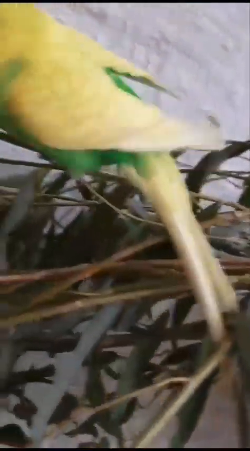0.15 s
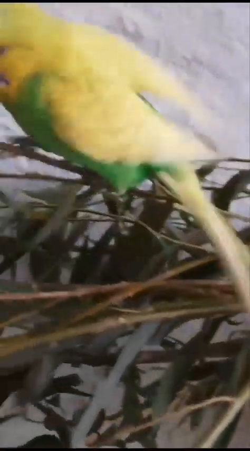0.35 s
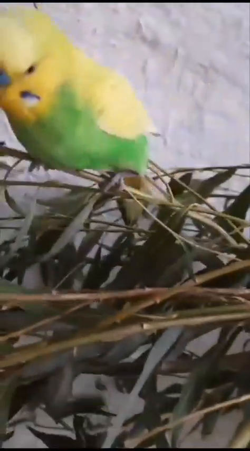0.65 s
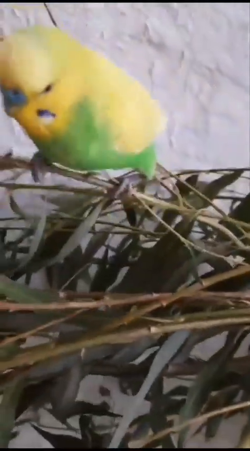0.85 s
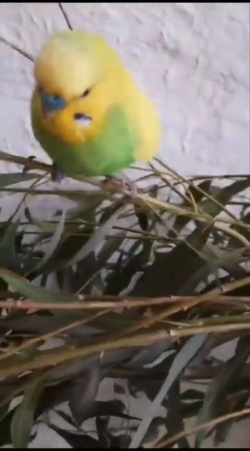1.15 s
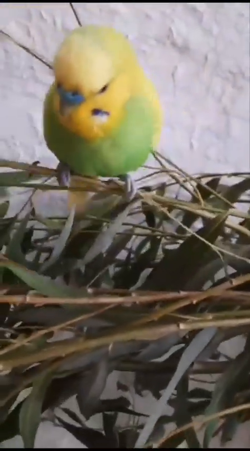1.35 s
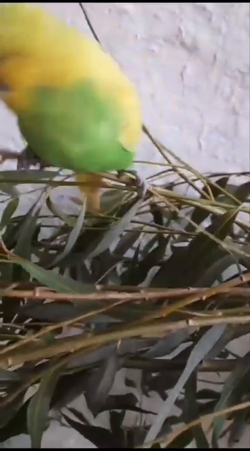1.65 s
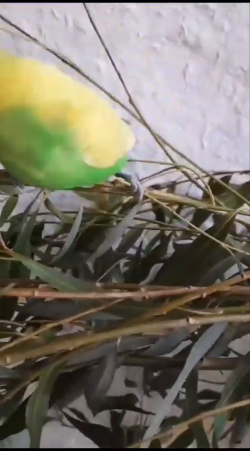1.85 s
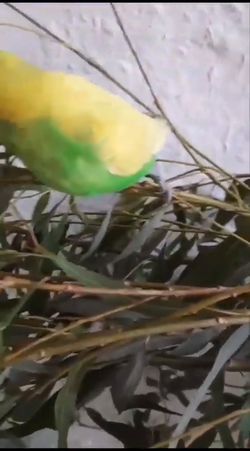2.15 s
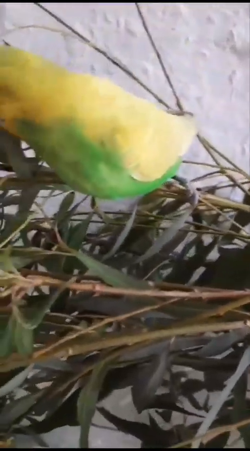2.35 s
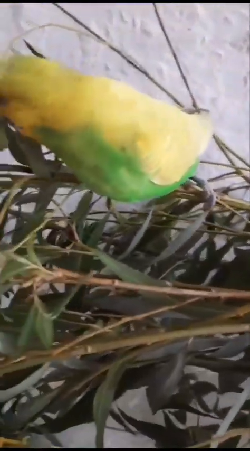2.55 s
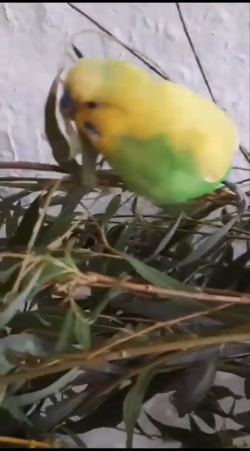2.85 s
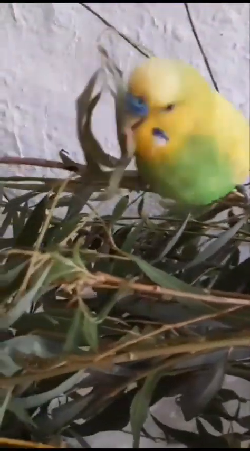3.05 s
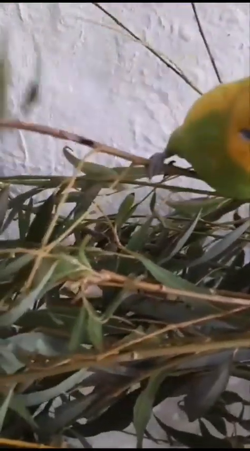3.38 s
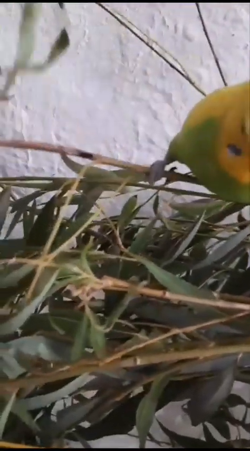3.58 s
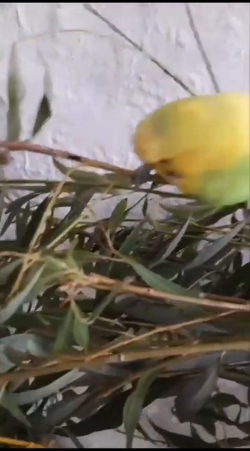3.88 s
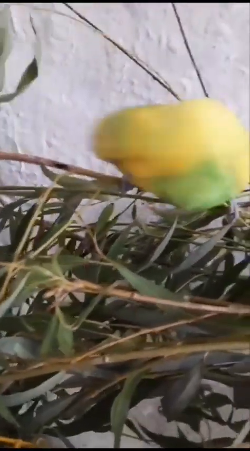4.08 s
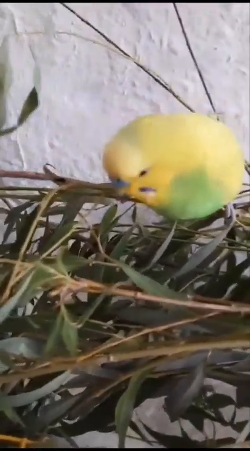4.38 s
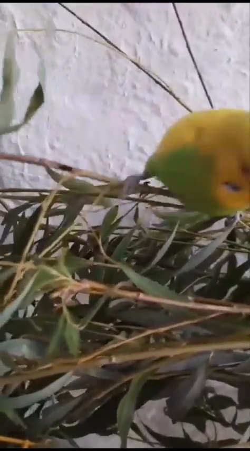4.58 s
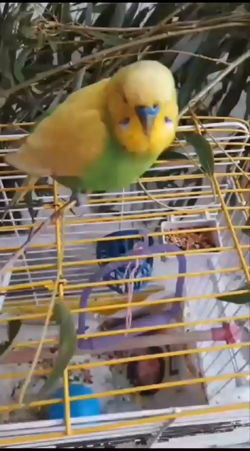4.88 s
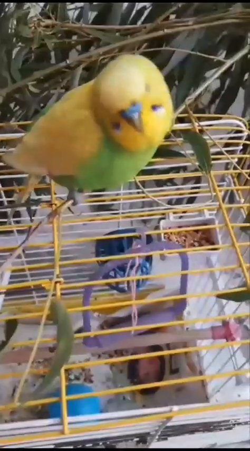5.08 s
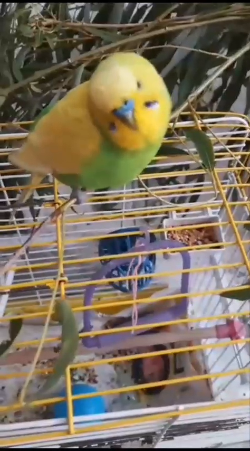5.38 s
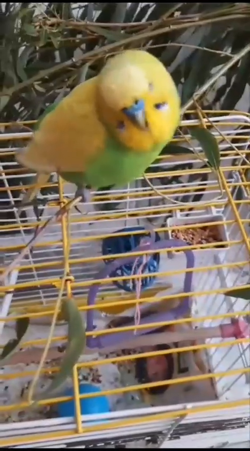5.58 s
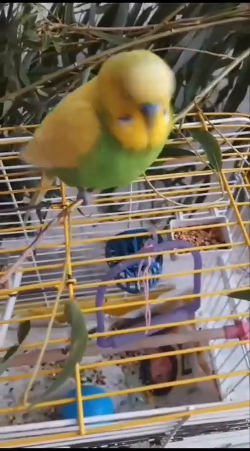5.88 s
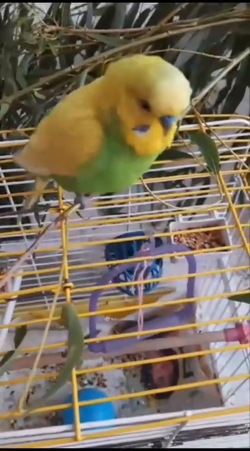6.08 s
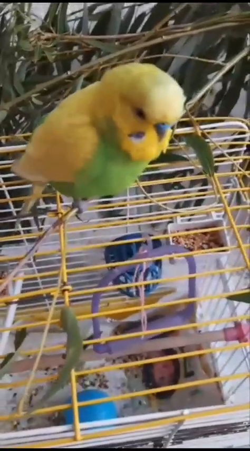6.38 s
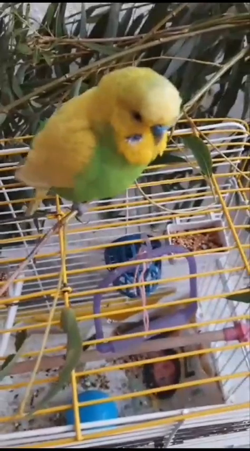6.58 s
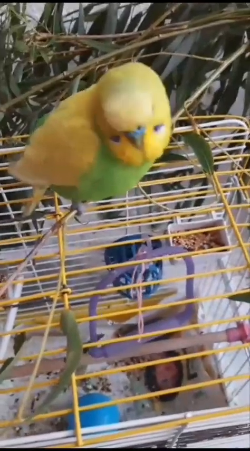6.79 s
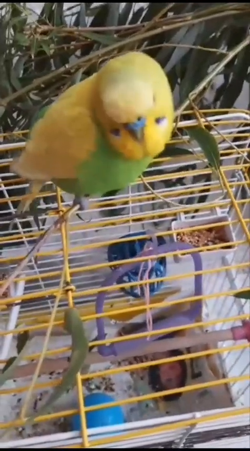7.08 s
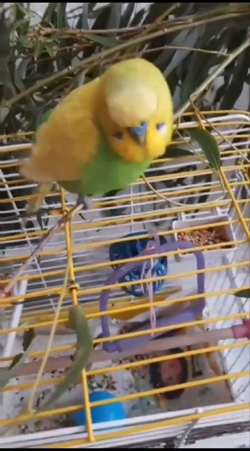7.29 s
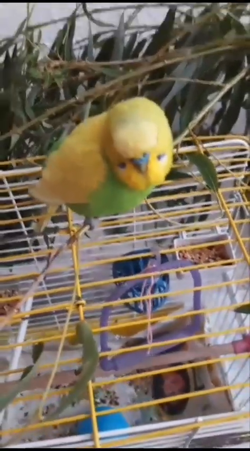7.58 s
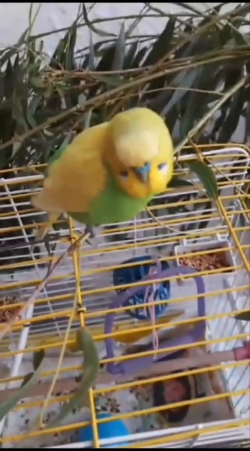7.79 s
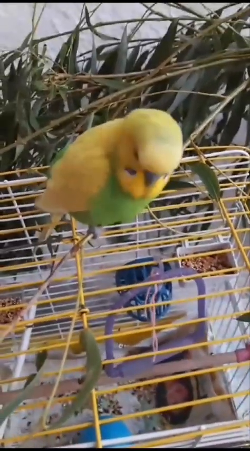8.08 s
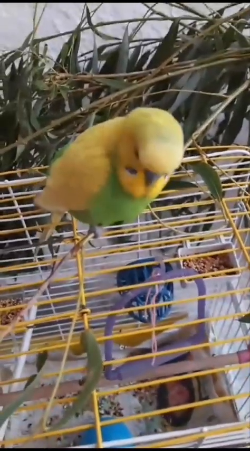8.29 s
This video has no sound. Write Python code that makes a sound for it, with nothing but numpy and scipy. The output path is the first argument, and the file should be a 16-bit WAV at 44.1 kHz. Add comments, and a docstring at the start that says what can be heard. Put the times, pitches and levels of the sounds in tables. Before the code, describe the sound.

A pet budgie chatters indoors: high, raspy squawks, each a fraction of a second, chopped into a fast rattle and spaced evenly. After about two and a half seconds it falls nearly silent except for two brief twittering chirps. Following a tiny dropout, the stereo balance shifts and scolding resumes, with smoother chirps mixed in, over soft hiss and faint room tone.

```python
"""Budgerigar scolding in a small room

Close to a two-port microphone a budgerigar gives two runs of harsh squawks, with chirps among and between them.
Its syrinx sings tones that swing wildly in pitch, chopped some 170 times a second; most chirps are smoother.
The room rings on after each call, a soft hiss comes and goes over faint room tone, and feathers rustle once.
A little past half way all sound drops out briefly; the balance of the two ports differs before and after."""
import sys
import numpy as np
from scipy import signal
from scipy.fft import rfft, irfft, next_fast_len
from scipy.io import wavfile
from scipy.ndimage import uniform_filter1d, map_coordinates

SR = 44100
rng = np.random.default_rng(int(sys.argv[2]) if len(sys.argv) > 2 else 0)


def materialize(psi):
    """Save the field psi as 16-bit PCM at rate SR to the path in sys.argv[1].

    A 1-D psi becomes a single channel; in a 2-D psi each row is a channel.
    """
    bounded = np.clip(np.atleast_2d(psi).T, -1, 1)
    quanta = np.round(bounded * 32767).astype(np.int16)
    wavfile.write(sys.argv[1], SR, quanta)


N = 372644
TIME = np.arange(N) / SR
# the brief silence: start_s, end_s
DROPOUT = (4.992, 5.078)


def undb(db):
    """Decibels to amplitude gain."""
    return 10 ** (np.asarray(db) / 20)


def unit(x):
    """Scale to rms 1."""
    return x / np.sqrt(np.mean(x ** 2))


def along(points, hz):
    """Read (frequency, value) points on a log-frequency axis."""
    point_hz, value = np.transpose(points)
    return np.interp(np.log(hz + 1), np.log(point_hz), value)


def colour(x, points, sign=1):
    """Filter by (Hz, dB) points, or by their inverse when sign is -1."""
    size = next_fast_len(x.shape[-1] + 512)
    gain = undb(sign * along(points, np.fft.rfftfreq(size, 1 / SR)))
    return irfft(rfft(x, size) * gain, size)[..., :x.shape[-1]]


def wander(t, rate):
    """A smooth random course with a new value `rate` times a second, spread near 1."""
    values = rng.standard_normal(1024)
    return map_coordinates(values, [(t - t[0]) * rate], order=3, mode="wrap")


def chop(t, rate, depth, sag_s, jitter=0.11, scatter_db=2.17, sharp=0.89):
    """The airflow is chopped into uneven puffs that slow down: returns their envelope and the place in each puff."""
    puffs_per_s = rate * np.exp(-t / sag_s) * (1 + jitter * wander(t, rate))
    place = (np.cumsum(puffs_per_s) / SR) % 1
    puff = unit(np.abs(np.sin(np.pi * place ** 0.6)) ** sharp)
    depth = np.clip(depth, 0, 1)
    envelope = unit(1 - depth + depth * puff)
    return envelope * undb(scatter_db * depth * wander(t, rate)), place


def edges(t, attack_s=0.002, release_s=0.0045):
    """The syrinx opens and shuts within a few milliseconds."""
    return np.clip((t - t[0]) / attack_s, 0, 1) * np.clip((t[-1] - t) / release_s, 0, 1)


def swinging_tone(t, hz, swing, rate):
    """Phase of a membrane whose pitch is thrown about at random, by the fraction `swing`."""
    return 2 * np.pi * np.cumsum(hz * (1 + swing * wander(t, rate))) / SR


def add(track, sound, start_s):
    """Mix a sound in at its time."""
    i = max(int(start_s * SR), 0)
    track[i:i + len(sound)] += sound[:max(N - i, 0)]


def squawks():
    """Each puff drives randomly swinging tones, held near the throat's resonances, and a spurt of air noise."""
    # the calls: start_s, length_s, nominal pitch_hz, level_db, low_db and upper_db (bands relative to the level)
    calls = [(.027, 0.051, 4603, -14, -6.5, -17.5), (0.61, .040, 5110, -12, -10, -16.5),
             (0.764, 0.0425, 4882, -13, -9.5, -8.5), (0.979, .034, 4910, -12.5, -17.5, -1.5),
             (1.168, .040, 4930, -12, -13, -10), (1.311, 0.064, 5040, -13, -13.5, -13),
             (1.465, 0.066, 5127, -12, -14, -13), (1.649, .052, 4670, -12.5, -9, -17.5),
             (1.817, 0.06, 4807, -13.5, -10, -8.5), (2.104, .050, 4583, -12.5, -10.5, -9.5),
             (2.393, .048, 4907, -13.5, -10, -11), (5.724, 0.04, 4930, -11.5, -12.5, -8),
             (5.863, 0.045, 5120, -11.5, -19.5, -13.5), (6.166, .048, 5220, -14, -12.5, -8.5),
             (6.313, 0.06, 5180, -13, -10.5, -7.5), (6.463, 0.059, 5200, -12.5, -15, -8),
             (6.615, .055, 4877, -12.5, -11, -5.5), (6.77, 0.065, 5343, -11.5, -14, -9.5),
             (6.944, .073, 5153, -12, -13.5, -8), (7.267, 0.056, 4913, -13, -22, -8),
             (7.425, 0.063, 5130, -14, -18, -10), (7.581, 0.06, 4734, -11.5, -14.5, -17),
             (7.741, .076, 5260, -11, -18.5, -16), (7.903, .060, 4760, -13, -12, -22),
             (8.058, .072, 4980, -12, -12.5, -16.5), (8.205, .062, 4920, -12, -12.5, -11.5),
             (8.351, .074, 5060, -12, -14.5, -17)]
    # colour of the air noise: frequency_hz, level_db
    air_colour = [(300, -31.5), (700, -25.5), (1200, -11), (1900, 0.5), (5000, 9.5), (8200, 8.5),
                  (9400, -1.5), (12000, 0.5), (16000, -5)]
    chop_hz, chop_sag_s = 189.7, 0.25  # puffs a second at the start; time constant of their slowing
    low_hz, throat_hz, upper_hz = 2200, 3550, 7700  # nominal pitches of the side tones
    throat_spread = 0.07  # the throat is set a little differently for every squawk
    main_db, throat_db = -1.17, -8
    air_before_db, air_after_db = -7.5, -4  # air relative to the call, in the first and second run
    grunt_hz, grunt_db, grunt_decay_s = 1152.6, -18, 0.01  # low tone at the start of the call
    fade_db = -3  # change of level from start to end
    out = np.zeros(N)
    for start_s, length_s, hz, db, low_db, upper_db in calls:
        t = np.arange(int((length_s + 0.0009) * SR)) / SR
        puffs, place = chop(t, chop_hz, depth=0.83, sag_s=chop_sag_s)
        arch = 1 + 0.142 * (np.sin(np.pi * place) - np.pi / 4)  # pitch follows the pressure of the puff
        opening = 1 - 0.1614 * np.exp(-t / 0.007917)  # the call starts low
        beak = 1 + 0.05 * wander(t, 70)  # beak and tongue shift during the call
        main = np.sin(swinging_tone(t, 1.05 * hz * arch * opening * beak, swing=0.1334, rate=1700))
        setting = 1 + throat_spread * rng.standard_normal()
        throat = np.sin(swinging_tone(t, throat_hz * setting * arch, swing=0.14, rate=1500))
        low = np.sin(swinging_tone(t, low_hz * arch * opening, swing=0.14, rate=1300))
        upper = np.sin(swinging_tone(t, upper_hz * beak, swing=0.05, rate=2100))
        voice = undb(main_db) * main + undb(throat_db) * throat
        voice = voice + undb(low_db) * low + undb(upper_db) * upper
        air = unit(colour(rng.standard_normal(8192), air_colour))[:len(t)]
        air_db = air_before_db if start_s < DROPOUT[0] else air_after_db
        grunt = np.exp(-t / grunt_decay_s) * np.sin(swinging_tone(t, grunt_hz, swing=0.15, rate=800))
        sound = voice + undb(grunt_db) * grunt + undb(air_db) * air
        sound = sound * puffs * edges(t, attack_s=0.0084)
        add(out, sound * undb(db + fade_db * (t / length_s - 0.5)), start_s)
    return out


def chirps():
    """Each note is one curve of pitch; the stronger its overtones, the deeper its chop."""
    # notes, alone or strung into a short phrase: start_s, length_s, first_hz, middle_hz, last_hz, level_db,
    # roughness (0-1), overtone_db
    notes = [(0.933, 0.036, 3794, 4425, 3920, -12, 0.14, -4.5),
             (0.969, .015, 3990, 4330, 3750, -13.5, .35, -6),
             (3.098, .012, 2050, 2200, 2250, -32, 0.2, -38),
             (3.106, .034, 2080, 1959, 2080, -19.5, 0.75, -27),
             (3.12, .025, 3007, 2947, 2802, -11.5, .8, -20), (3.142, .031, 2350, 2930, 2940, -11, .15, -28),
             (3.175, .028, 3220, 3200, 2400, -19.5, .42, -22),
             (3.196, .025, 3350, 3884, 3320, -16, .36, -13.5),
             (3.21, .036, 2900, 2547, 2530, -17.5, 0.36, -20.5),
             (4.740, 0.011, 1890, 3020, 3160, -17, 0.4, -29),
             (4.749, 0.015, 3420, 3454, 3300, -8.5, 0.23, -19),
             (4.761, 0.034, 3333, 3954, 3210, -16, .16, -15),
             (4.793, 0.017, 3406, 3280, 3180, -10, 0.09, -27),
             (4.813, 0.018, 3320, 3260, 3135, -22, .14, -24),
             (4.824, 0.023, 2880, 2667, 2570, -15, 0.2, -25.5),
             (5.562, 0.0223, 3985, 3788, 3460, -10.5, 0.66, -7),
             (6.001, 0.052, 4000, 3846, 3590, -14, .32, 1),
             (6.048, 0.039, 3620, 3497, 3473, -24, 0.33, 12.5),
             (7.256, .007, 3150, 3220, 3200, -27, 0.25, -10),
             (7.271, .052, 4100, 3850, 3594, -19, 0.55, -4.5)]
    # how the throat passes the overtones: frequency_hz, level_db
    throat_colour = [(4000, 6), (6000, -3.5), (7200, 2), (8500, 0), (9800, -14.5), (13000, -10.5),
                     (16000, -20.5)]
    # colour of the rasp: frequency_hz, level_db
    rasp_colour = [(300, -20), (1000, -8), (2000, -10.5), (4000, 1), (5400, 5), (6500, -1), (8300, 9.5),
                   (9800, -12), (13000, -8), (16000, -15)]
    chop_hz, chop_sag_s = 185, 0.59  # puffs a second at the start; time constant of their slowing
    chop_depth, chop_per_db = 0.9, 0.022  # depth at overtone_db 0, and its growth per dB
    rise_db = 1.5  # change of level from start to end
    out = np.zeros(N)
    for start_s, length_s, first_hz, middle_hz, last_hz, db, rough, overtone_db in notes:
        t = np.arange(int(length_s * SR)) / SR
        curve = np.polyfit([0, 0.5, 1], [first_hz, middle_hz, last_hz], 2)
        hz = np.polyval(curve, t / length_s)
        puffs, _ = chop(t, chop_hz, chop_depth + chop_per_db * overtone_db, chop_sag_s)
        phase = swinging_tone(t, hz, swing=0.2 * rough, rate=1200)
        overtones = sum(undb(along(throat_colour, k * hz)) * np.sin(k * phase) for k in range(2, 5))
        rasp = rough * unit(colour(rng.standard_normal(16384), rasp_colour))[:len(t)]
        voice = np.sqrt(2) * np.sin(phase) + undb(overtone_db) * (np.sqrt(2) * overtones + rasp)
        add(out, voice * puffs * edges(t) * undb(db + rise_db * (t / length_s - 0.5)), start_s)
    return out


def ports(x):
    """The right port of the microphone hears the bird later, and mostly shaded in the treble."""
    # left minus right as the bird sits before the dropout: frequency_hz, level_db
    before = [(300, -2.5), (1200, 5.5), (2000, -7), (4000, -3), (5500, -5.5), (6700, -6), (7400, 17),
              (8200, 10), (9500, 14), (11500, 11.5), (16000, 6.5)]
    # left minus right as it sits after the dropout: frequency_hz, level_db
    after = [(300, 10), (1300, 24), (2200, -2), (3600, -1.5), (5600, 8), (6800, 1), (8200, 11.5),
             (8900, 29), (9500, 20), (10600, 55), (12200, 5.5), (15500, 5.5)]
    # how far the right port lags: frequency_hz, phase_rad
    port_lag = [(0, 0), (1400, 0), (2050, 1.7), (2600, 3.3), (3400, 4.5), (7500, 11.5), (16000, 24)]
    right = np.where(TIME < DROPOUT[0], colour(x, before, sign=-1), colour(x, after, sign=-1))
    size = next_fast_len(N + 512)
    lag_rad = np.interp(np.fft.rfftfreq(size, 1 / SR), *np.transpose(port_lag))
    delayed = irfft(rfft(right, size) * np.exp(-1j * lag_rad), size)[:N]
    return np.array([x, delayed])


def reflections(x, near_db=-14, decay_s=0.0022):
    """Quick reflections from the wall and cage, different at each port."""
    t = TIME[:SR // 20]
    response = rng.standard_normal((2, len(t))) * np.exp(-t / decay_s) * (t > 0.0007)
    response = undb(near_db) * unit(response) / np.sqrt(len(t))
    return signal.fftconvolve(x, response, axes=1)[:, :N]


def room(x, ring_db=-8.0, build_s=0.034):
    """The diffuse ring of the room builds up, then dies away, longest in the bass; one pitch stands out."""
    # time to fall by 60 dB: frequency_hz, t60_s
    decay_times = [(400, 0.67), (1500, 0.3936), (3000, 0.3524), (6000, 0.3861), (9000, 0.2747),
                   (15000, 0.36)]
    # colour of the ring: frequency_hz, level_db
    ring_colour = [(200, 0), (1500, -3), (2300, 2.5), (3200, -1), (4000, -2), (6200, -2.5), (8000, -4),
                   (10000, -2.5), (16000, -8)]
    mode_hz, mode_t60_s, mode_db = 2594, 0.3, -35  # the pitch that rings on more strongly
    t = TIME[:SR * 3 // 4]
    build = np.clip(t / build_s, 0, 1) ** 0.5
    f, frame_s, cells = signal.stft(rng.standard_normal((2, len(t))), SR, nperseg=256)
    fade = np.exp(-np.log(1000) * frame_s / along(decay_times, f)[:, None])
    ring = signal.istft(cells * fade, SR)[1][:, :len(t)]
    ring = colour(ring, ring_colour) * build
    mode = np.sin(swinging_tone(t, mode_hz, swing=0.018, rate=200))
    mode = mode * np.exp(-np.log(1000) * t / mode_t60_s) * build
    response = undb(ring_db) * unit(ring) + undb(mode_db) * unit(mode)
    return signal.fftconvolve(x[None], response / np.sqrt(len(t)), axes=1)[:, :N]


def rustle(centre_s=4.5, width_s=0.058, peak_db=-53.5):
    """A faint swish of noise, likely of feathers, as the bird turns on its twig."""
    # colour of the swish: frequency_hz, level_db
    swish_colour = [(1200, -25), (2700, 6), (4200, 0), (6500, -14), (16000, -23)]
    swell = np.exp(-((TIME - centre_s) / width_s) ** 2)
    return undb(peak_db) * swell * unit(colour(rng.standard_normal((2, N)), swish_colour))


def background(spectrum, level_db, shared=0.61):
    """Soft, slightly wavering noise, partly common to both ports."""
    left, right, common = rng.standard_normal((3, N))
    noise = unit(colour(np.array([left, right]) + shared * common, spectrum))
    return noise * undb(level_db + 0.85 * wander(TIME, 15))


def hiss(floor_db=-74, rise_s=0.019, fall_s=0.0916):
    """A faint steady hiss, with swells that rise, hold and die away."""
    # the swells: start_s, held_s, level_db
    swells = [(-.03, 0.4, -54.5), (5.059, 0.46, -49), (5.6, 2.9, -55.5)]
    # relative density of the noise: frequency_hz, level_db
    spectrum = [(590, -41), (1000, -14.5), (1310, -17.5), (1540, -19), (2130, -5), (4790, 0.5),
                (9280, -7.5), (13900, -14.5), (16000, -15)]
    gain = undb(floor_db)
    for start_s, held_s, db in swells:
        t = TIME - start_s
        swell = np.clip(t / rise_s, 0, 1) * np.exp(-np.maximum(t - held_s, 0) / fall_s)
        gain = np.hypot(gain, undb(db) * swell)
    return background(spectrum, 20 * np.log10(gain))


def room_tone():
    """The quiet of the room: mostly low noise whose level drifts slowly."""
    # relative density of the noise: frequency_hz, level_db
    spectrum = [(15, -43.5), (25, -15.5), (92, -3.5), (149, -4.5), (175, -15), (344, -8), (405, -12),
                (695, -19), (1330, -14), (1560, -23), (2050, -22), (2550, -33), (8140, -31), (11600, -29),
                (16000, -36.5)]
    # course of its level: time_s, level_db
    course = [(0, -59), (2.2, -65.5), (2.8, -64.5), (3.6, -60.5), (4.7, -56.5), (5.202, -61), (5.5, -54.5),
              (8.45, -62)]
    return background(spectrum, np.interp(TIME, *np.transpose(course)))


def scene(ring_after_db=-0.5, beak_hz=850):
    """The bird, whose small beak radiates little bass, its room (ringing a little less later) and the background."""
    beak = signal.butter(3, beak_hz, "highpass", fs=SR, output="sos")
    bird = signal.sosfilt(beak, squawks() + chirps())
    direct = ports(bird)
    ring = room(bird * undb(ring_after_db * (TIME > DROPOUT[0])))
    return direct + reflections(direct) + ring + rustle() + room_tone() + hiss()


def record(dry, lopsided_before=0.33, lopsided_after=0.43, treble_hz=7000, top_hz=16000):
    """The microphone bends loud treble lopsidedly, which adds a faint low flutter; the sound drops out once."""
    treble = signal.sosfilt(signal.butter(3, treble_hz, "highpass", fs=SR, output="sos"), dry)
    # squaring the treble leaves its envelope as a low sound
    flutter_band = signal.butter(1, [35, 450], "bandpass", fs=SR, output="sos")
    flutter = signal.sosfilt(flutter_band, treble ** 2)
    flutter = signal.sosfilt(signal.butter(2, 35, "highpass", fs=SR, output="sos"), flutter)
    lopsided = np.where(TIME < DROPOUT[0], lopsided_before, lopsided_after)
    sound = np.tanh(dry / 1.67) * 1.546 + lopsided * flutter  # loud peaks are rounded off
    live = 1.0 * ((TIME < DROPOUT[0]) | (TIME > DROPOUT[1]))
    live = uniform_filter1d(live, size=200)  # softens the edges of the dropout
    top = signal.ellip(10, 0.2, 90, top_hz, fs=SR, output="sos")
    return signal.sosfilt(top, sound * live)


dry = scene()
out = record(dry)
materialize(out)
```